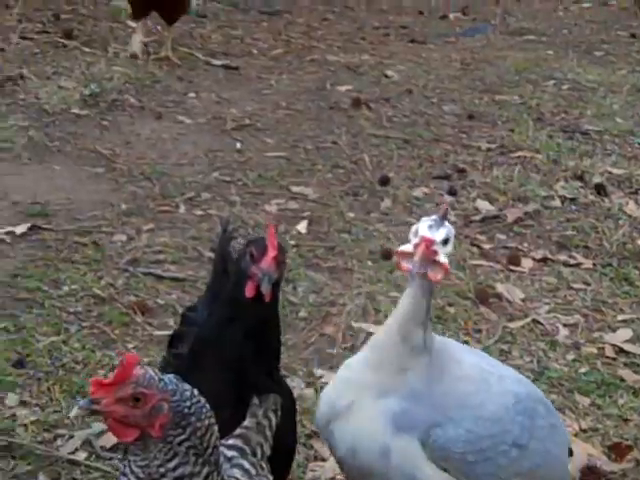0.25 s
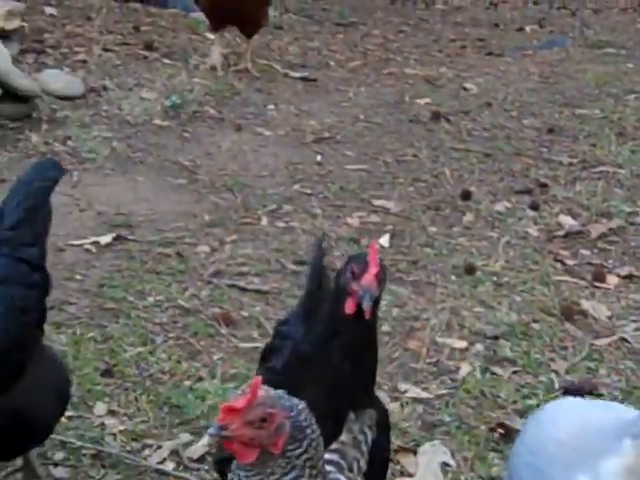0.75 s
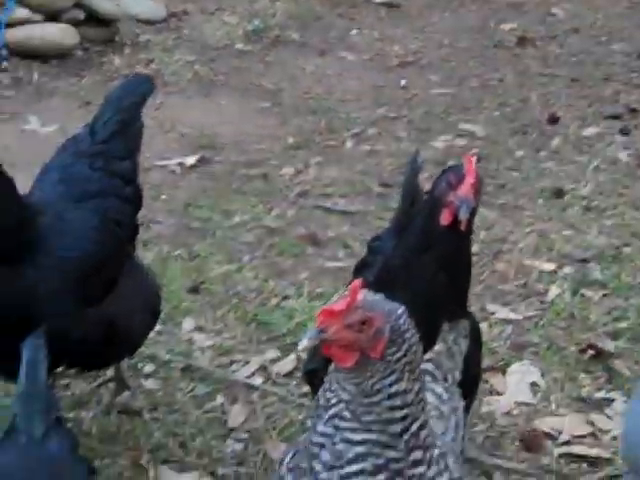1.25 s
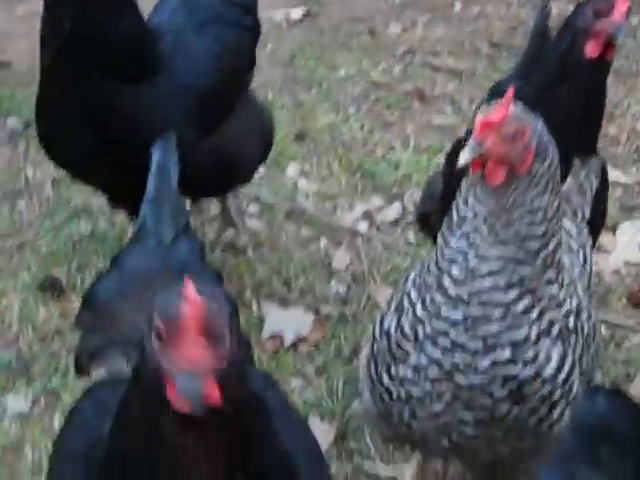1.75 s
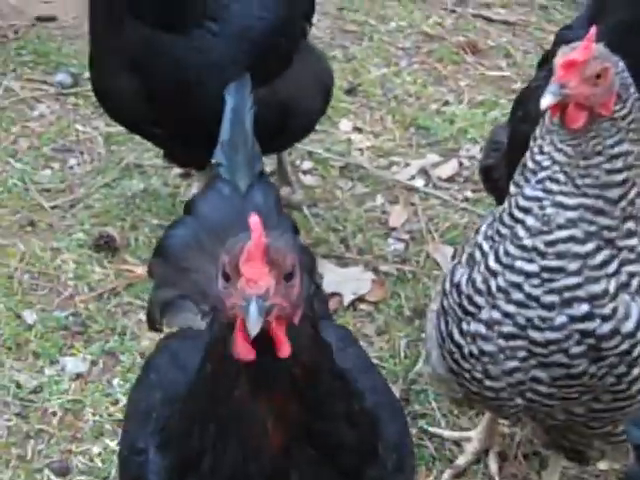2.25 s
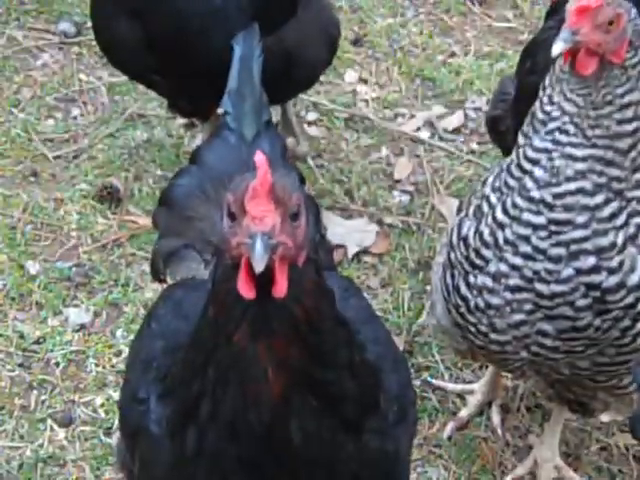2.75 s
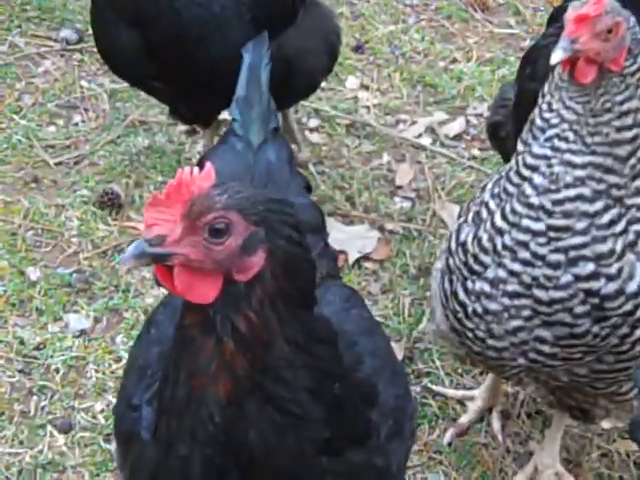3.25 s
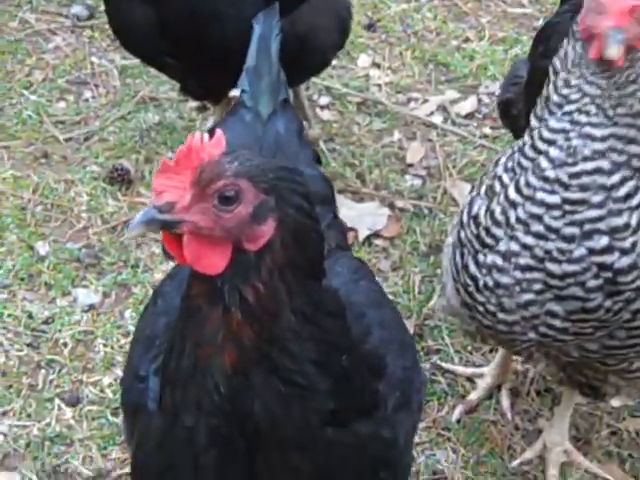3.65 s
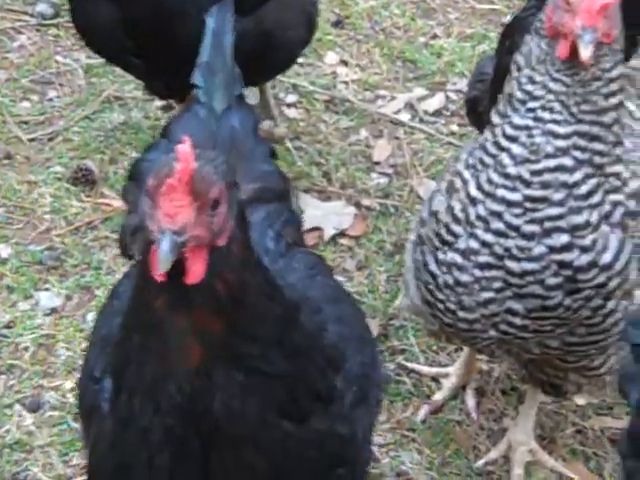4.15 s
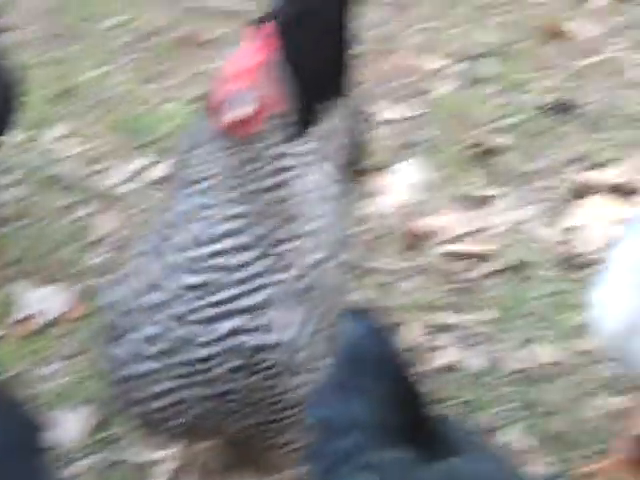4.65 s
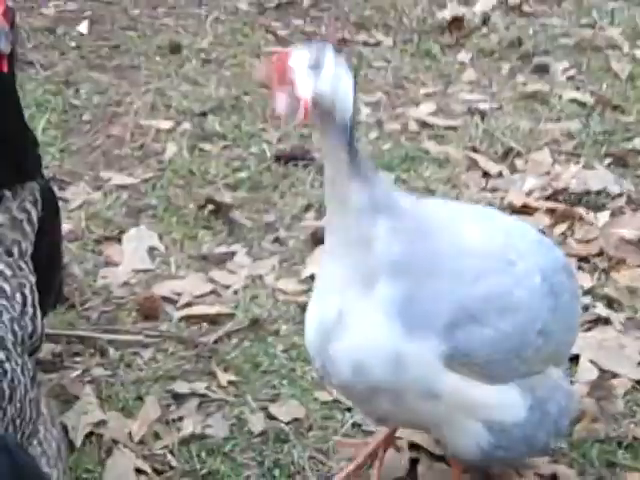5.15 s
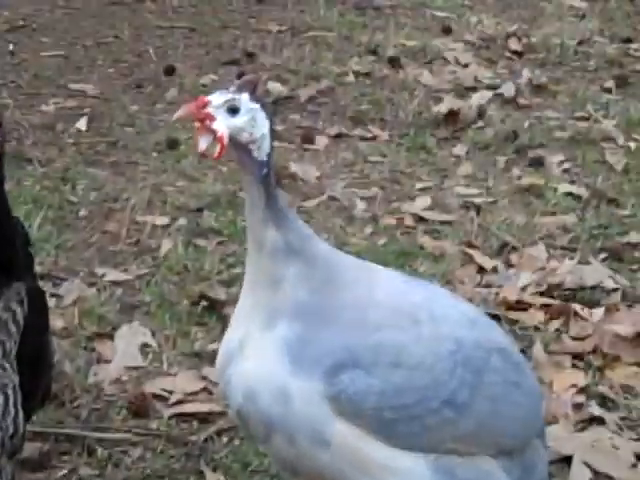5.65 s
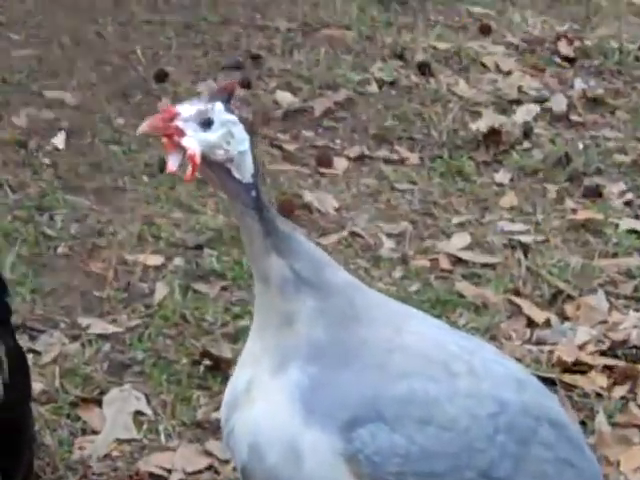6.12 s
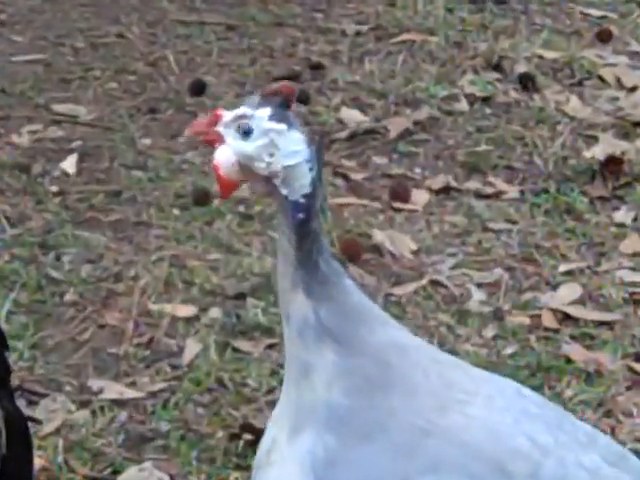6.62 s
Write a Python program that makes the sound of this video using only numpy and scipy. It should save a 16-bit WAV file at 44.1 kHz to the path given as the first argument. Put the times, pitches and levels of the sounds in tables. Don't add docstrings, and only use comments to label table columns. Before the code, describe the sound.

Backyard hens cluck and coo softly between a guineafowl's piercing, breaking honks, with crisp leaf crunches and faint distant traffic hum.

```python
import sys
import numpy as np
from scipy import signal
from scipy.fft import rfft, irfft
from scipy.io import wavfile
from scipy.ndimage import uniform_filter1d

SR = 44100
rng = np.random.default_rng(int(sys.argv[2]) if len(sys.argv) > 2 else 0)


def dump_mix(stems):
    frames = np.atleast_2d(stems).T
    limited = np.clip(frames, -1, 1)
    pcm = np.round(limited * 32767).astype(np.int16)
    wavfile.write(sys.argv[1], SR, pcm)


def gain_from_db(level_db):
    decades = np.asarray(level_db, float) / 20
    return 10 ** decades


N = 303408


def shape(points, hz):
    f, db = np.transpose(points)
    return gain_from_db(np.interp(np.log(np.maximum(hz, 1)), np.log(f), db))


def unit(x):
    return x / np.sqrt(np.mean(x ** 2))


def filtered(x, gain):
    return unit(irfft(rfft(x) * gain(np.arange(N // 2 + 1) * SR / N), N))


def ringing(modes):
    return lambda hz: sum(gain_from_db(db) / (1 + (2 * (hz - f) / w) ** 2) ** 2 for f, w, db in modes)


def walk(rate_hz, size=N):
    k = int(SR / rate_hz)
    held = np.repeat(rng.standard_normal(size // k + 1), k)
    return 1.3 * uniform_filter1d(uniform_filter1d(held, k), k)[:size]


def snaps(size, spike_db):
    return rng.standard_normal(size) * gain_from_db(spike_db * np.minimum(rng.exponential(size=size), 5))


def span(rows, fade_s=0.003715):
    s, *columns = np.transpose(rows)
    start = int((s[0] - fade_s) * SR)
    t = np.arange(start, int((s[-1] + fade_s) * SR)) / SR
    edge = np.clip(np.minimum(t - t[0], t[-1] - t) / (2 * fade_s), 0, 1)
    return start, edge, [np.interp(t, s, c) for c in columns]


def arch(s, peak_s, end_s, db, edge_db):
    u = np.linspace(-1, 1, num=17)
    return np.interp(u, [-1, 0, 1], [s, peak_s, end_s]), u, db + edge_db * u ** 2


def swell(s, peak_s, end_s, db, edge_db):
    return [(s, db + edge_db), (peak_s, db), (end_s, db + edge_db)]


def add(out, start, x):
    out[..., start:start + x.shape[-1]] += x[..., :N - start]


def pan(x, db):
    return x * gain_from_db(np.array([db + 0 * x, -db + 0 * x]) / 2)


def sing(hz, gains, rough, flutter_hz, smear=0):
    phase = 2 * np.pi * np.cumsum(hz * (1 + 0.04 * rough * walk(flutter_hz, len(hz)))) / SR
    tone = sum(g * np.cos((k + 1) * phase - 1.3 * k - smear * k ** 2) for k, g in enumerate(gains))
    return np.sqrt(2) * tone * (1 + rough * walk(2 * flutter_hz, len(hz)))


# peak_s, rise_s, fall_s, pitch_hz, fundamental_db
HONKS = [
    (0.629, 0.013, 0.017, 1291, -18.5),
    (1.605, 0.0061, 0.0094, 1246, -15.5),
    (3.311, 0.0062, 0.014, 1264, -11),
    (4.781, 0.02, 0.014, 1245, -17.5),
    (5.02, 0.0059, 0.0093, 1321, -30),
    (6.749, 0.0069, 0.013, 1264, -11.5),
]
# second_partial_db, higher_partials_db, rasp_db, roughness_0_to_1, echo_db
BEAK = [
    (-2.5, -21, -8.5, 0.08, 0),
    (3, -13, 3.5, 0.35, -0.5),
    (-2, -12, -5.5, 0.07, -1.2),
    (4, -12.5, -8.5, 0.08, -3.5),
    (10, -3.5, 6.5, 0, 13),
    (-1.5, -9, 0, 0.1, 0),
]
SAG_HZ_PER_S, LATE_SAG_SHARE = 10900, 0.59
QUICK_RISE_S = 0.00621
HONK_EDGE_DB, HONK_ROUND = -24.5, 2.95
THIRD_OVER_SECOND_DB, PUFF_DEPTH = 3, 0.52


def honk(s, rise, fall, hz, db):
    t, u, _ = arch(s - rise, s, s + fall, db, HONK_EDGE_DB)
    sag = SAG_HZ_PER_S * min(QUICK_RISE_S / rise, 1) ** 2 * np.where(u > 0, LATE_SAG_SHARE, 1)
    return np.transpose([t, hz - sag * (t - s), db + HONK_EDGE_DB * np.abs(u) ** HONK_ROUND])


def honks(breath):
    out = np.zeros((2, N))
    for row, (second_db, upper_db, rasp_db, rough, echo_db) in zip(HONKS, BEAK):
        start, edge, (hz, db) = span(honk(*row), 0.0017)
        upper = [upper_db + d for d in (6, 0, -4, -4, -15, -24, -25, -26)]
        gains = gain_from_db([0, second_db, second_db + THIRD_OVER_SECOND_DB] + upper)
        cycles = np.cumsum(hz) / SR
        limp = 1 + 0.43 * rough * np.cos(np.pi * cycles)
        puffs = 1 + PUFF_DEPTH * np.cos(2 * np.pi * cycles)
        rasp = gain_from_db(rasp_db) * puffs * breath[start:start + len(hz)]
        voice = limp * sing(hz, gains, np.clip(rough, 0, 1), 420) + rasp
        add(out, start, edge * gain_from_db(db) * voice * gain_from_db([[0], [echo_db]]))
    return out


# start_s, length_s, top_hz, last_hz, level_db
WHISTLES = [
    (0.599, 0.022, 2380, 2430, -25),
    (1.555, 0.046, 3670, 3330, -10),
    (3.264, 0.043, 3860, 3920, -10),
    (6.704, 0.041, 3730, 3214, -10),
]
# share_of_length, share_of_climb, under_level_db
WHISTLE_ARC = [(0, 0, -44), (.28, 0.36, -26.5), (0.539, .8, -10), (.76, 0.99, -7)]
# start_s, pitch_hz, level_db
SLIDE = [(4.995, 3530, -40), (5.004, 4090, -38), (5.011, 3430, -28.5), (5.018, 2920, -24)]
# second_partial_db, roughness_0_to_1
WHISTLE_VOICE = [(-13, .05), (-31, .1), (-27, .6), (-25, .1), (-28, .2)]
WHISTLE_FOOT_HZ, BEAK_TOP_HZ = 1883, 9000
TIP_SHARE, TIP_DROP, TIP_DB = 0.86, 0.31, -0.5
TRILL_HZ, TRILL_DEPTH, TRILL_SWING = 258, 0.032, 0.23
WHISTLE_OVERTONE_LIFT = 0.63


def whistle(s, length, top_hz, last_hz, db):
    climb_hz = top_hz - WHISTLE_FOOT_HZ
    climb = [(s + u * length, WHISTLE_FOOT_HZ + up * climb_hz, db + under) for u, up, under in WHISTLE_ARC]
    tip = (s + TIP_SHARE * length, top_hz + TIP_DROP * (last_hz - top_hz), db + TIP_DB)
    return climb + [tip, (s + length, last_hz, db)]


def whistles(breath):
    out = np.zeros((2, N))
    for rows, (second_db, rough) in zip([whistle(*row) for row in WHISTLES] + [SLIDE], WHISTLE_VOICE):
        start, edge, (hz, db) = span(rows, 0.00229)
        i = np.arange(len(hz))
        climbing = np.clip(8 * (1 - hz / hz.max()), 0, 1) * (i < hz.argmax())
        trill = climbing * np.sin(2 * np.pi * TRILL_HZ * i / SR)
        hz, edge = hz * (1 + TRILL_DEPTH * trill), edge * (1 + TRILL_SWING * trill)
        closed = 1 / (1 + (np.outer([2, 3], hz) / BEAK_TOP_HZ) ** 10)
        lift_db = WHISTLE_OVERTONE_LIFT * (db.max() - db)
        overtones = closed * gain_from_db(np.add.outer([second_db, second_db - 7], lift_db))
        voice = sing(hz, [1, *overtones], rough, 250) + gain_from_db(-15) * breath[start:start + len(hz)]
        add(out, start, edge * gain_from_db(db) * voice * gain_from_db([[0], [-11]]))
    return out


def guineafowl():
    tract = ringing([(3530, 3330, -9.5), (5105, 2700, -18.5), (8400, 2900, -20), (13000, 3100, -35)])
    breath = filtered(rng.standard_normal(N), tract)
    out = whistles(breath) + honks(breath)
    return signal.sosfiltfilt(signal.butter(3, 800, "high", fs=SR, output="sos"), out)


# start_s, length_s, first_hz, last_hz, level_db
CLUCKS = [
    (0.236, 0.048, 317, 396, -31.5),
    (0.369, 0.04, 283.5, 318, -31),
    (0.504, 0.032, 321.6, 428, -28),
    (0.65, 0.043, 317, 424, -30.5),
    (0.88, 0.034, 319.4, 493, -28),
    (1.031, .038, 318, 592, -28.5),
    (1.209, 0.04, 334.6, 582, -27),
    (1.135, 0.021, 430, 430, -38),
]
# start_s, pitch_hz, level_db
MOANS = [
    [(2.092, 258, -50), (2.104, 256.4, -35.5), (2.144, 262.7, -36.5), (2.156, 254, -39.5),
     (2.184, 258, -37.5), (2.202, 290.6, -39), (2.234, 302, -48.5), (2.246, 292.6, -39),
     (2.278, 313.4, -44.5), (2.295, 297, -68)],
    [(4.165, 337, -45), (4.182, 263.5, -32.5), (4.205, 217, -34), (4.228, 201, -48)],
]
# odd_partials_db, tilt_db_per_octave, roughness_0_to_1, second_resonance_db
THROAT = [(-3.5, 3.5, 0.98, -12.5), (-31, -6, 0.5, 3), (-3.5, 4.5, 1, -2.5), (-0.5, 0, 1, 0),
          (1, 6.5, 0.92, 1), (0, 5.5, 0.8, 2.5), (-2, 6.5, 0.6, 4.5), (1.5, 6.5, 1.2, 6),
          (-3.5, -1.5, 0.15, .1), (-3, 11, 0.15, -5)]
# freq_hz, gain_db
HEN = [(250, -6.5), (400, -3.5), (650, 9), (900, -9.5), (1250, 3), (1600, -13.5), (1900, -9.5), (2300, -32),
       (2600, -17), (3100, -34), (3700, -22.5), (4100, -29.5), (4500, -54)]
# freq_hz, gain_db
MOAN_THROAT = [(250, -2), (500, -15.5), (600, -6), (780, 3.5), (1030, -3.5), (1280, -10.5), (1550, -15),
               (1900, -24), (3000, -38.5)]
SECOND_HZ, SECOND_WIDTH_HZ = 1300, 260
CLUCK_BEND, CLUCK_FADE_DB, CLUCK_ATTACK_S = 2.2, -7, 0.0013
CLUCK_DULLING_DB = -5


def cluck(s, length, first_hz, last_hz, db):
    u = np.linspace(0, 1, num=25)
    late = u ** CLUCK_BEND
    opening_db = -12 * np.exp(-u * length / CLUCK_ATTACK_S)
    return np.transpose([s + u * length, first_hz + (last_hz - first_hz) * late,
                         db + CLUCK_FADE_DB * late + opening_db])


def clucks_and_moans():
    out = np.zeros(N)
    calls = [(cluck(*row), HEN, 0.55) for row in CLUCKS]
    calls += [(MOANS[0], MOAN_THROAT, 0.55), (MOANS[1], MOAN_THROAT, 0)]
    for (rows, throat, smear), (odd_db, tilt_db, rough, second_db) in zip(calls, THROAT):
        start, edge, (hz, db) = span(rows, 0.001)
        slope_db = tilt_db + np.linspace(0, CLUCK_DULLING_DB, len(hz))
        gains = []
        for k in range(1, 15):
            resonance_db = second_db * np.exp(-((k * hz - SECOND_HZ) / SECOND_WIDTH_HZ) ** 2)
            slant_db = slope_db * np.log2(np.maximum(k * hz / 1100, 1))
            breakup = 1 + rough * min((k - 1) / 5, 1.5) * walk(500, len(hz))
            gains.append(shape(throat, k * hz) * gain_from_db(odd_db * (k % 2) + resonance_db + slant_db) * breakup)
        gains = np.array(gains)
        gains = gains / np.sqrt(uniform_filter1d(np.sum(gains ** 2, axis=0), size=300))
        add(out, start, edge * gain_from_db(db) * sing(hz, gains, np.clip(rough / 4, 0, 1), 400, smear))
    return out


# start_s, length_s, top_hz, last_hz, level_db
FLIPS = [
    (0.398, 0.028, 950, 790, -39),
    (0.526, 0.049, 1050, 754, -41),
    (.555, 0.031, 1490, 1460, -55),
    (0.912, 0.026, 1130, 580, -41),
    (1.063, 0.03, 1160, 480, -38.5),
    (1.24, 0.022, 1090, 570, -40.5),
    (5.916, 0.025, 850, 840, -49),
    (6.097, 0.076, 1492, 1340, -52.5),
]
# start_s, pitch_hz, level_db
WARBLES = [
    [(.695, 772, -40), (.715, 744, -40.5), (.735, 683, -37), (.752, 583, -30.5), (.763, 785, -44),
     (.773, 713, -36.5), (.782, 1050, -42.5), (.792, 867, -44), (.804, 495, -38)],
    [(3.245, 888, -50), (3.262, 600, -54.5), (3.285, 740, -35), (3.305, 766, -32.5), (3.32, 910, -34),
     (3.335, 800, -42.5)],
]
FLIP_TOP_SHARE, FLIP_EDGE_DB = 0.33, -6


def flip(s, length, top_hz, last_hz, db):
    t, u, level = arch(s, s + length / 2, s + length, db, FLIP_EDGE_DB)
    from_top = ((u + 1) / 2 - FLIP_TOP_SHARE) / (1 - FLIP_TOP_SHARE)
    return np.transpose([t, top_hz - (top_hz - last_hz) * from_top ** 2, level])


def flips():
    out = np.zeros(N)
    for rows in [flip(*row) for row in FLIPS] + WARBLES:
        start, edge, (hz, db) = span(rows)
        second_db = -3 - 14 * np.clip((hz - 750) / 200, 0, 1)
        add(out, start, edge * gain_from_db(db) * sing(hz, [1, gain_from_db(second_db), gain_from_db(-26)], 0.26, 136))
    return out


# start_s, pitch_hz, level_db
COO = [(2.3, 700, -50), (2.34, 701, -55.5), (2.365, 729, -41.5), (2.39, 702, -58), (2.44, 685, -67),
       (2.46, 690, -53.5), (2.6, 724, -39.5), (2.9, 758, -34), (3.06, 783, -31.5), (3.15, 819, -33.5),
       (3.168, 796, -50.5)]
# peak_s, pitch_rise_hz, level_rise_db
QUAVERS = [(2.466, 63, 13.5), (2.525, 83.6, 13), (2.631, 105.7, 6.5), (2.684, 100.8, 7), (2.782, 127, 4),
           (2.842, 129.5, 4.5), (2.95, 116.6, 3.5), (3.008, 116.3, 2), (3.095, 90.4, 3.5), (3.128, 58.6, 2)]
COO_UPPER_DB = (-28, -33)
QUAVER_HALF_S = 0.021


def coo():
    out = np.zeros(N)
    start, edge, (hz, db) = span(COO, 0.029)
    t = (start + np.arange(len(hz))) / SR
    rise_hz, rise_db = sum(np.outer([up_hz, up_db], np.exp(-np.abs((t - s) / QUAVER_HALF_S) ** 2))
                           for s, up_hz, up_db in QUAVERS)
    hz, db = hz + rise_hz, db + rise_db
    broken = gain_from_db(2.5 * walk(40, len(hz)) + np.linspace(-11, 1, len(hz)))
    windpipe = gain_from_db(-18) / (1 + ((2 * hz - 1480) / 100) ** 2)
    early = gain_from_db(-57 - db) * (t < QUAVERS[2][0])
    second = windpipe + gain_from_db(-40) + early
    gains = [1, second * broken, *np.outer(gain_from_db(COO_UPPER_DB), broken)]
    add(out, start, edge * gain_from_db(db) * sing(hz, gains, 0.24, 90))
    return out


# start_s, peak_s, end_s, level_db
GROWLS = [
    (3.699, 3.766, 3.79, -39.5),
    (3.847, 3.855, 3.93, -43.5),
    (4.111, 4.122, 4.165, -26),
    (4.158, 4.21, 4.235, -40),
]
GROWL_EDGE_DB, GROWL_LIMP = -20, 0.69


def growls():
    out = np.zeros(N)
    throat = [(200, -2.0), (400, -8), (800, 15.5), (1100, 0.5), (1600, -8), (3000, -17.5), (4500, -10)]
    gains = shape(throat, 203.0 * np.arange(1, 22))
    for row in GROWLS:
        start, edge, (db,) = span(swell(*row, GROWL_EDGE_DB))
        hz = np.full(len(db), 190.)
        limp = 1 + GROWL_LIMP * np.cos(np.pi * np.cumsum(hz) / SR)
        add(out, start, edge * gain_from_db(db) * unit(sing(hz, gains, 0.29, 200) * limp))
    return out


# start_s, pitch_hz, level_db
PEEPS = [
    [(2.17, 7600, -51), (2.21, 7500, -65), (2.26, 7470, -55)],
    [(2.55, 5500, -59), (2.62, 5480, -62.5), (2.75, 5480, -69)],
]


def peeps():
    out = np.zeros(N)
    for rows in PEEPS:
        start, edge, (hz, db) = span(rows)
        add(out, start, edge * gain_from_db(db) * sing(hz, [1], 0.1, 88))
    return out


def crackle(gains, spike_db, flicker_db, alike):
    def layer():
        return unit(sum(gain_from_db(db + flicker_db * walk(250)) * filtered(snaps(N, spike_db), gain)
                        for gain, db in gains))
    mid, side = layer(), layer()
    return np.sqrt((1 + alike) / 2) * mid + np.sqrt((1 - alike) / 2) * side * np.array([[1], [-1]])


# start_s, peak_db, knock_db, left_minus_right_db
CHEKS = [(4.342, -6, -4, -5), (4.3483, -20, 5.5, -8), (4.367, -38.5, 4, 18), (4.543, -7.5, -23, -1.5),
         (4.5522, -12, -4.5, 1), (4.569, -25, 2, -1), (4.7424, -5, -34, -2.5), (4.749, -13, 2, -6),
         (4.953, -32, -6, -14), (4.961, -6.5, -10.5, 1.5), (4.9668, -29.5, 17.5, -13),
         (4.979, -35, 14.5, -7), (5.1927, -5, -19.5, 0.5), (5.2, -22.5, 10.5, -5), (5.2144, -45, -12, 6.5)]
# start_s, peak_db, knock_db, knock_hz, length_s
SCRATCHES = [(3.57, -58, -7, 2980, 0.0026), (3.587, -32, -13, 1230, 0.03), (3.6674, -33.5, -9, 1310, 0.017),
             (4.071, -40.5, -7, 1420, 0.031), (4.102, -29, 2.5, 1050, 0.029), (4.11, -22.5, 6, 960, 0.014),
             (4.1213, -20, 6.5, 2880, 0.031), (4.15, -12, 0, 2930, 0.0065), (4.18, -18, -6.5, 720, 0.0042),
             (5.52, -52, 14.5, 2270, 0.0081), (5.594, -43.5, 5, 1300, .005), (5.696, -33, 3.5, 746, 0.0036)]
CHEK_KNOCK_HZ, CHEK_S, SCRATCH_PAN_DB = 1970, 0.0094, 2
UNDER_SNAPS_DB = -6.5


def bursts(crunch):
    out, t = np.zeros((2, N)), np.arange(int(SR / 5)) / SR
    cheks = [(s, db, low_db, CHEK_KNOCK_HZ, CHEK_S, pan_db) for s, db, low_db, pan_db in CHEKS]
    scratches = [(*row, SCRATCH_PAN_DB) for row in SCRATCHES]
    for s, db, low_db, low_hz, length, pan_db in cheks + scratches:
        i = int(s * SR)
        level = gain_from_db(db - 5.0 + UNDER_SNAPS_DB * (4.1 < s < 5.21))
        hold = np.exp(-(t / max(length, 0.001)) ** 2)
        decay = hold + gain_from_db(-17.5) * np.exp(-t / 0.026) + 0.21 * np.exp(-t / 0.00128)
        fall = level * np.minimum(t / 0.00028, 1) * decay
        thud = unit(signal.lfilter(*signal.iirpeak(low_hz, 2.5, fs=SR), snaps(len(t), 1.0)))
        add(out, i, pan(fall, pan_db) * crunch[:, i:i + len(t)] + gain_from_db(low_db) * fall * thud)
    return out


# start_s, peak_db
CRACKS = [(0.058, -42), (0.092, -43), (0.1054, -45), (0.1447, -37), (0.241, -34.5), (.352, -44),
          (0.3681, -35.5), (.386, -38), (0.406, -34), (.431, -45), (0.702, -34.5), (0.7546, -37.5),
          (0.8992, -39.5), (0.921, -35), (0.969, -40), (1.0937, -34.5), (1.125, -40), (1.651, -44),
          (1.682, -51), (1.697, -45.5), (1.813, -58), (1.845, -45), (2.164, -44.5), (2.196, -46),
          (3.52, -43), (3.575, -28), (3.649, -47), (3.805, -50.5), (4.2602, -39.5), (4.5027, -43),
          (4.525, -49), (4.94, -42.5), (5.136, -47.5), (5.187, -40.5), (5.357, -40), (5.3987, -37),
          (5.6104, -46)]
CRACK_T60_S, TICK_DB, TICK_S = 0.12, 4, 0.0012


def cracks(dry):
    out, t = np.zeros((2, N)), np.arange(int(SR / 5)) / SR
    bright = dry + np.diff(dry, n=2, append=np.zeros((2, 2)))
    body = np.exp(-np.log(1000) * t / CRACK_T60_S)
    tick = gain_from_db(TICK_DB) * np.exp(-t / TICK_S)
    for s, db in CRACKS:
        i = int(s * SR)
        add(out, i, gain_from_db(db - 3.5) * (body * dry[:, i:i + len(t)] + tick * bright[:, i:i + len(t)]))
    return out


# start_s, peak_s, end_s, hiss_db, knock_db
DRAG = [
    (1.445, 1.515, 1.56, -41, -36),
    (4.181, 4.186, 4.24, -29.5, -19),
    (5.449, 5.47, 5.482, -30.5, 1),
    (5.476, 5.492, 5.52, -24.5, -2.5),
    (6.32, 6.4, 6.47, -37, -21),
    (5.6, 5.92, 6.3, -69, 13),
    (6.22, 6.25, 6.31, -52.5, -11.5),
]
# freq_hz, width_hz, level_db
KNOCK = [(1050, 2500, -10.5), (2120, 1300, 6)]
DRAG_EDGE_DB, DRAG_PAN_DB = -15, -0.5


def drags(crunch, dry):
    out = np.zeros((2, N))
    knock = crackle([(ringing(KNOCK), 0)], 4.2, 1.0, 0.89)
    for *row, low_db in DRAG:
        i, edge, (db,) = span(swell(*row, DRAG_EDGE_DB))
        part = slice(i, i + len(db))
        bed = 0.86 * crunch[:, part] + 0.63 * dry[:, part] + gain_from_db(low_db) * knock[:, part]
        add(out, i, pan(edge * gain_from_db(db), DRAG_PAN_DB) * bed)
    return out


# time_s, level_db
RUSTLE = [(0.0, -48), (0.45, -54.5), (0.69, -45.5), (0.88, -54), (1.51, -54.5), (2.01, -62.5), (2.59, -58),
          (3.1, -69), (3.73, -49), (3.87, -58), (4.27, -59), (4.37, -42.5), (4.76, -86), (5.02, -46),
          (5.13, -57), (5.38, -43), (5.751, -63), (6.88, -60.5)]


def rustle(dry):
    s, db = np.transpose(RUSTLE)
    level_db = np.interp(np.arange(N) / SR, s, db) + 2.2 * walk(40) + 3 * walk(300)
    return gain_from_db(level_db) * dry[:, ::-1]


# freq_hz, width_hz, level_db
BURST = [(3000, 3000, 1.5), (4660, 2360, 9.5), (5890, 2400, 12), (6380, 3900, 10.5), (7960, 4800, 12),
         (10100, 2300, 2)]
# freq_hz, level_db_per_hz
LEAVES = [(880, -34), (1500, -5.5), (1780, -38), (2040, -12), (4200, -9), (6800, -1.5), (8450, -2),
          (10800, -20.5), (13800, -13.5), (14900, -38.5)]


def feet():
    crunch = crackle([(ringing([(f, w, 0)]), db) for f, w, db in BURST], 3.0, 3.5, 0.7)
    dry = crackle([(lambda hz: shape(LEAVES, hz), 0)], 2.5, 2.5, 0.1)
    return bursts(crunch) + cracks(dry) + drags(crunch, dry) + rustle(dry)


# start_s, peak_db, ring_hz
SCRATCH_SNAPS = [(4.1055, -19, 3530), (4.1173, -12, 940), (4.119, -8.5, 3330), (4.121, -2, 2860),
                 (4.1228, -8, 860), (4.1273, -16.5, 900), (4.1285, -20.5, 1425), (4.1309, -41.5, 880),
                 (4.1328, -21.5, 900), (4.1346, -15.5, 3720), (4.1388, -12, 1440), (4.1432, -26, 720),
                 (4.1522, -25, 7900), (4.1547, -13.5, 890), (4.182, -19.5, 7700), (4.1971, -16, 8030),
                 (4.2065, -32, 7330)]
# start_s, peak_db, ring_hz
CHEK_SNAPS = [(4.3432, -14, 5620), (4.3454, -16.5, 1760), (4.3466, -9.5, 1690), (4.3482, -26, 1800),
              (4.3511, -9, 6610), (4.3528, -31, 7390), (4.3554, -11.5, 4030), (4.363, -21.5, 1910),
              (4.5444, -24, 6630), (4.5459, -11, 7700), (4.5474, -3, 6870), (4.5497, -3, 7040),
              (4.5512, -3, 5250), (4.553, -24, 7700), (4.556, -8, 7410), (4.5579, -12, 2090),
              (4.5607, -7, 4140), (4.562, -15.5, 1790), (4.569, -16.5, 1890), (4.7431, -7, 6900),
              (4.7452, -23, 6780), (4.7464, -16, 6800), (4.7497, -11, 6940), (4.751, -14.5, 2170),
              (4.7524, -17, 6540), (4.7546, -11, 6780), (4.756, -14.5, 4290), (4.9554, -25, 6600),
              (4.9623, -29, 6910), (4.9638, -6, 6500), (4.9659, -15, 6760), (4.9676, -23, 3170),
              (4.9694, -5.5, 4600), (4.971, -17, 4800), (4.9726, -8.5, 1770), (4.9754, -18, 2450),
              (4.9806, -12, 2450), (5.1935, -9.5, 2220), (5.1947, -25, 2000), (5.198, -7, 6560),
              (5.1992, -4, 4630), (5.2003, -14, 4500), (5.204, -8, 4670), (5.2055, -30, 2280),
              (5.2077, -26, 4370), (5.2109, -19, 2340)]
# start_s, peak_db, ring_hz
LEAF_TICKS = [(0.0045, -32, 4100), (0.0098, -26.5, 3700), (0.0586, -31, 7880), (0.0923, -24, 8140),
              (0.1067, -28, 4590), (0.1412, -28, 8000), (0.1459, -27, 8400), (1.0913, -24, 4230),
              (1.1027, -39, 7860), (1.1204, -29, 3770), (1.1259, -30, 6400), (1.133, -30, 6800),
              (1.482, -30, 6610), (1.486, -24.5, 6700), (1.5026, -44, 7620), (1.5149, -39, 7640),
              (1.5197, -37, 6870), (3.5756, -33, 7800), (3.5865, -14.5, 8250), (3.5932, -19, 7870),
              (3.6015, -28, 8140), (3.6088, -30, 7950), (3.6233, -28, 8300), (3.687, -24, 8230),
              (5.2388, -32, 7110), (5.2464, -27, 7240), (5.2521, -24, 7040), (5.3582, -23.5, 4470),
              (5.3659, -28, 7700), (5.3802, -27, 8050), (5.3908, -26, 8510), (5.3983, -23, 5660),
              (5.4013, -30, 7900), (5.4577, -28, 6800), (5.463, -29, 2090), (5.466, -22, 1940),
              (5.469, -32, 2130), (5.472, -20, 2200), (5.477, -15.5, 2150), (5.4828, -11, 7020),
              (5.4878, -10, 2250), (5.4929, -9, 6250), (5.496, -12, 2300), (5.4996, -13.5, 6500),
              (5.5032, -16, 2120), (5.5066, -28, 2260), (5.517, -18.5, 2220), (5.5809, -45, 7560),
              (5.5863, -37, 6330), (5.6171, -41, 8200), (6.382, -22, 6620), (6.3874, -21, 6630),
              (6.3922, -31, 7110), (6.3988, -21, 8800), (6.4048, -22, 7300), (6.4108, -35, 6420),
              (6.4205, -32, 6370), (6.4259, -21.5, 6130)]
# freq_hz, level_db, t60_s
SNAP_MODES = [(2350, -9, 0.0045), (4670, -4.5, 0.0071), (6700, -10, 0.0056), (8200, -6, 0.0066)]
SNAP_CYCLES, SNAP_DB = 16, -1.5


def snapping():
    out, t = np.zeros(N), np.arange(int(SR / 40)) / SR

    def ring(hz, t60, turn):
        return np.sin(2 * np.pi * (hz * t + turn)) * np.exp(-np.log(1000) * t / t60)

    rows = list(SCRATCH_SNAPS) + list(CHEK_SNAPS) + list(LEAF_TICKS)
    for (s, db, hz), chance in zip(rows, rng.random((len(rows), 8))):
        shared = sum(gain_from_db(g + 6.5 * (c - 1.5)) * ring(f * (1 + 0.053 * (c - 0.5)), t60, turn)
                     for (f, g, t60), c, turn in zip(SNAP_MODES, chance[:4], chance[4:]))
        own_t60 = (SNAP_CYCLES / max(hz, 3000) + 0.0046) * (0.78 + 0.78 * chance[0])
        onset = np.minimum(t / 0.00025, 1)
        add(out, int((s - 0.0004) * SR), gain_from_db(db + SNAP_DB) * onset * (ring(hz, own_t60, 0) + shared))
    return out


FENCE_S, FENCE_DB, TAIL_T60_S, TAIL_DB = 0.023, -28, 0.67, -29.5


def echoes(x):
    t = np.arange(SR) / SR - FENCE_S
    slap = gain_from_db(FENCE_DB) * unit(np.exp(-(t / 0.011) ** 2))
    tail = gain_from_db(TAIL_DB) * unit((t > -0.012) * np.exp(-np.log(1000) * t / TAIL_T60_S))
    response = (slap + tail) * rng.standard_normal((2, SR)) / np.sqrt(SR)
    return signal.fftconvolve(x[None], response, axes=1)[:, :N]


# freq_hz, level_db_per_hz
YARD = [(15, -68.5), (25, -21.5), (81, -1), (118, 3.5), (372, -14.5), (635, -15.5), (1310, -14),
        (1800, -18), (2110, -23.5), (2550, -23), (4590, -31), (7830, -29), (9960, -37), (13700, -37),
        (14900, -56)]
YARD_DB = -48


def yard():
    out, drift = 0, walk(0.142)
    for hz in 30 * 2 ** np.arange(10):
        def band(f):
            octaves = np.log2(np.maximum(f, 1) / hz)
            return shape(YARD, f) * np.cos(np.pi / 2 * np.clip(octaves, -1, 1))
        size = np.sqrt(np.sum(band(np.arange(1., SR / 2)) ** 2)) * gain_from_db(0.42 * drift + 2.38 * walk(6.3))
        mid, side = (filtered(rng.standard_normal(N), band) for _ in range(2))
        width = min(0.15 + hz / 4200.0, 1)
        out = out + size * (mid + width * side * np.array([[1], [-1]]))
    return unit(out) * gain_from_db(YARD_DB)


# freq_hz, phase_rad
PORT_PHASE = [(0, 0), (2500, -.8), (5000, -2.4), (6000, -2.3), (6900, .7), (8000, 0), (9000, -2.6),
              (10500, -3.8), (15000, -5)]
# freq_hz, gain_db
PORT_GAIN = [(100, 0), (3500, .5), (5000, -2), (6100, -9), (7000, -1), (8000, 11), (9000, 14), (15000, 5)]


def ports(heard):
    hz = np.arange(N // 2 + 1) * SR / N
    left = shape(PORT_GAIN, hz)
    lead = np.exp(1j * np.interp(hz, *np.transpose(PORT_PHASE)))
    even_power = np.sqrt(2 / (1 + left ** 2))
    return irfft(rfft(heard) * [left * lead, 0 * left + 1] * even_power, N)


def scene():
    fowl, fowl_far = guineafowl()
    flock = clucks_and_moans() + flips() + coo() + growls() + peeps()
    leaves = feet() + snapping()
    near = pan(fowl + flock, 0.076) + leaves
    far = echoes(fowl_far + flock + 1.24 * leaves.mean(axis=0))
    return ports(near + far + yard())


def top_cut(x):
    return signal.sosfilt(signal.butter(12, 15030, fs=SR, output="sos"), x)


def record(dry):
    top = signal.butter(5, 13000, fs=SR, output="sos")
    mix = np.clip(signal.sosfilt(top, np.clip(dry, -1, 1)), -1, 1)
    return top_cut(mix)


dry = scene()
out = record(dry)
dump_mix(out)
```